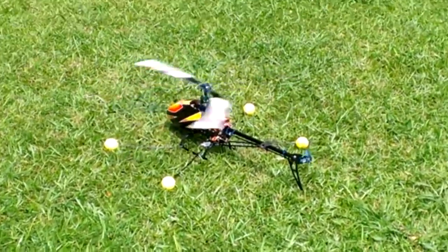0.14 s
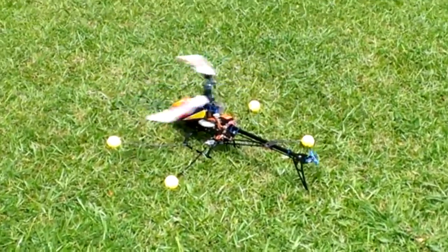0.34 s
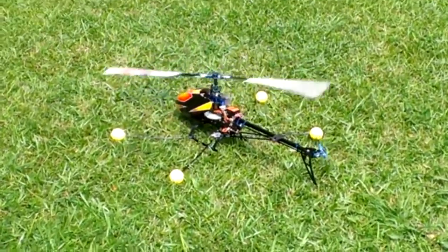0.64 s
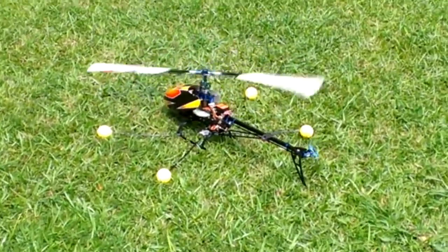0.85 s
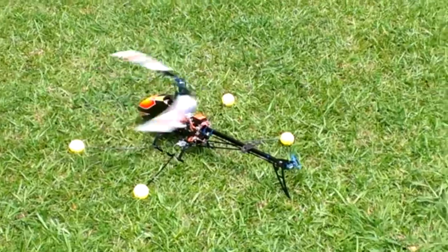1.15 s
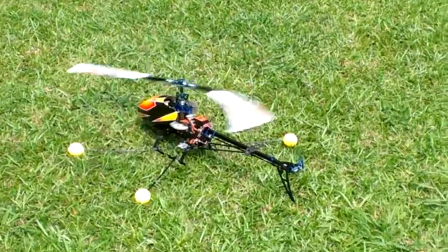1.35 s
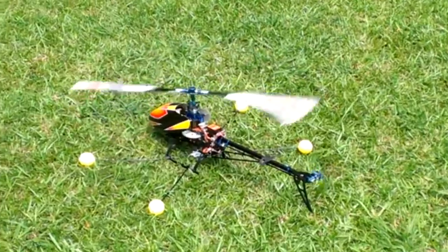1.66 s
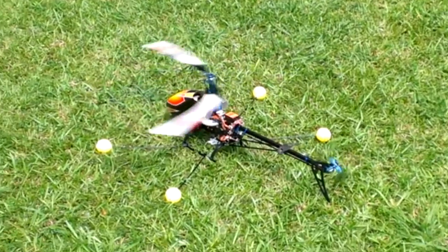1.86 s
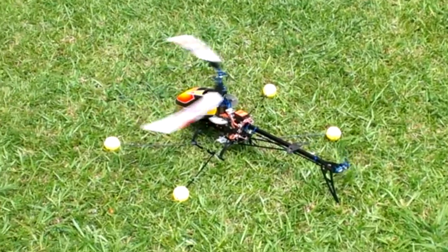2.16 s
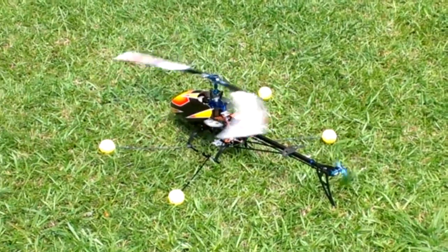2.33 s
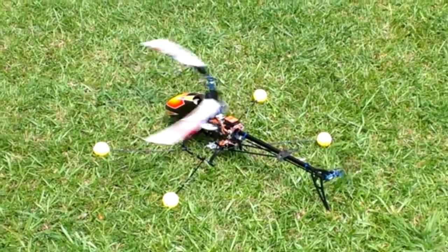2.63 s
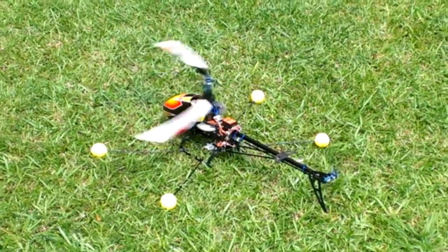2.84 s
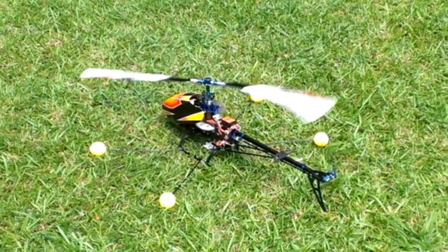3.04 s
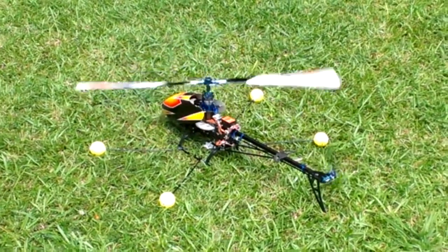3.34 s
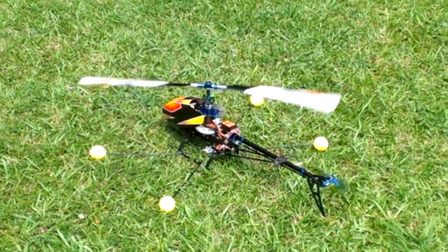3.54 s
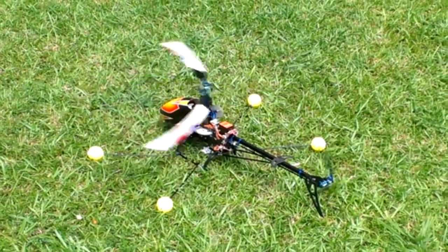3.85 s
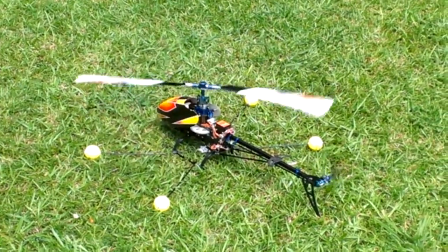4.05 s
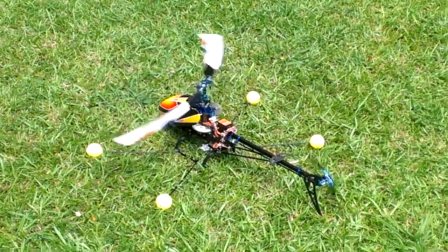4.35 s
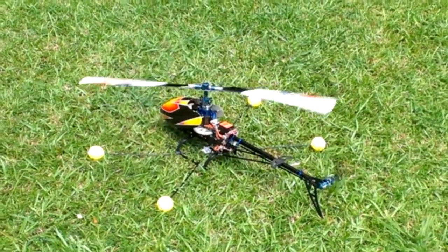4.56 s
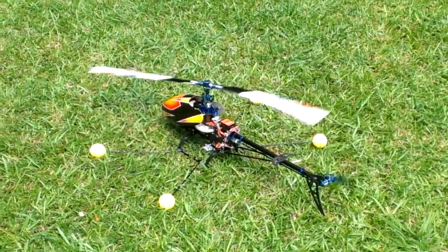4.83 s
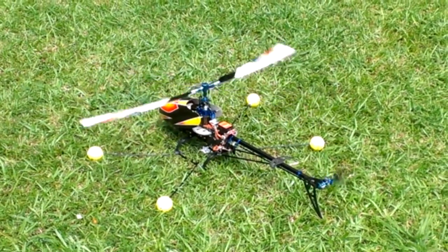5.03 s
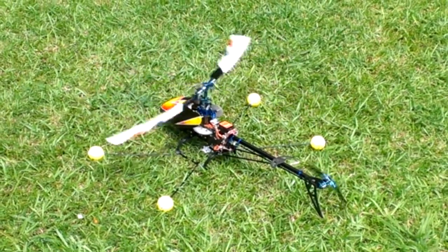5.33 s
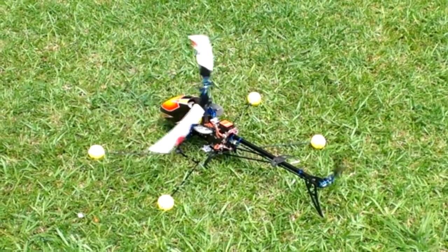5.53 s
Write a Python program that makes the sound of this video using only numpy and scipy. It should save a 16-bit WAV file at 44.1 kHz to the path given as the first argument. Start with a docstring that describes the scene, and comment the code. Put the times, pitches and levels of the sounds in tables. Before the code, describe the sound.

Outdoors on dry open grass with no echo, a model helicopter's motor and gears run down. The bright pulsing whine and sizzling rattle come first, then glide lower and weaken. Rough chatter, low frame buzzes and brittle gear clicks follow, thinning to faint rough squeaks and light ticking over barely audible air and distant hum. A quick soft rustle closes it, slightly right.

```python
"""A small electric model helicopter coasts down for 5.7 s on an open lawn, over faint air and a distant hum.
From the start the gear whine throbs once per rotor turn, motor and tail drive sing, and the teeth rattle and tick.
One falling shaft speed paces these; brief treble flares and frame shudders come at set times.
So do scrapes from 2.7 s and sharp clicks from 3.3 s; near 4 s a falling squeak and faint magnet tones appear.
A soft rustle, shaped noise, swells just before the end."""
import sys
import numpy as np
from scipy import signal
from scipy.fft import rfft, irfft, next_fast_len
from scipy.io import wavfile
from scipy.ndimage import map_coordinates

SR = 44100
rng = np.random.default_rng(int(sys.argv[2]) if len(sys.argv) > 2 else 0)


def int16_out(signal):
    """Quantize to a 16-bit WAV file."""
    q = np.round(np.clip(np.atleast_2d(signal).T, -1, 1) * 32767)
    wavfile.write(sys.argv[1], SR, q.astype(np.int16))


N = 250796
PINION_TEETH, GEAR_TEETH = 13, 150
MOTOR_PER_ROTOR = GEAR_TEETH / PINION_TEETH


def amp(db):
    """Decibels to gain."""
    return 10 ** (np.asarray(db) / 20)


def unit(x):
    """Scale to rms 1."""
    return x / np.sqrt(np.mean(x ** 2) + 1e-20)


def along(points, hz):
    """Interpolate (freq_hz, value) points on a log frequency axis."""
    f, v = np.transpose(points)
    return np.interp(np.log(hz + 1), np.log(f + 1), v)


def bumps(rows, x):
    """Summed dB of bell-shaped (centre, width, gain_db) peaks or dips."""
    return sum(db * np.exp(-((x - centre) / width) ** 2) for centre, width, db in rows)


def curve(points):
    """(time_s, value) points as one value per sample."""
    s, value = np.transpose(points)
    return np.interp(np.arange(N) / SR, s, value)


def wobble(knots_per_s):
    """Smooth random curve."""
    knots = rng.standard_normal(int(N * knots_per_s / SR) + 4)
    return map_coordinates(knots, [np.arange(N) * knots_per_s / SR])


def filtered(x, response):
    """Apply a frequency response."""
    m = next_fast_len(N + SR // 2)
    return irfft(rfft(x, m) * response(np.fft.rfftfreq(m, 1 / SR)), m)[..., :N]


def panned(lean_db):
    """Left and right gains whose mean is 1; lean_db is left minus right."""
    gains = amp(np.array([lean_db, -lean_db]) / 2).reshape(2, -1)
    return gains / gains.mean(axis=0)


def at_speed(motor_hz, start_db, power):
    """Level in dB of a sound whose strength follows a power of the shaft speed."""
    return start_db + power * 20 * np.log10(motor_hz / motor_hz[0])


# narrow hollows in the noise colour: (centre_hz, width_hz, gain_db)
HOLLOWS = [(3440, 140, -22), (8290, 200, -13)]
# left-right correlation: (freq_hz, correlation)
ALIKE = [(60, 0.79), (130, 0.96), (290, 0.97), (640, 0.96), (1410, 0.83), (3100, 0.57), (6820, 0.77),
         (15000, 0.5)]
# stereo lean: (freq_hz, left_minus_right_db)
LEAN = [(60, -0.5), (95, 1), (150, -4.5), (240, -0.5), (380, -1.5), (600, -2.5), (950, -1), (1500, 1.5),
        (2380, -0.5), (3770, -1), (5980, 4), (9470, -0.5), (15000, 1.5)]


def radiate(pair, spectrum, hollows=HOLLOWS):
    """Colour two unrelated excitations and spread them in stereo; the middle has rms 1 before the lean."""
    def mid_side(hz):
        angle = np.arccos(np.clip(along(ALIKE, hz), -1, 1)) / 2
        colour = amp(along(spectrum, hz) + bumps(hollows, hz))
        return colour * [np.cos(angle), np.sin(angle)]

    mid, side = filtered(pair, mid_side)
    stereo = np.array([mid + side, mid - side])
    return filtered(stereo, lambda hz: panned(along(LEAN, hz))) / np.std(mid)


def partial(turns, waver_db, blur_rad):
    """Shaft tone of rms 1, unsteady in strength and phase."""
    return unit(amp(waver_db * wobble(45)) * np.sin(2 * np.pi * turns + blur_rad * wobble(60)))


def ringing(centre_hz, width_hz):
    """Noise of rms 1 in one bell-shaped resonance."""
    noise = rng.standard_normal(N)
    return unit(filtered(noise, lambda hz: np.exp(-((hz - centre_hz) / width_hz) ** 2)))


def burst(start_s, length_s):
    """Envelope that rises fast and falls as a Gaussian of about the given length."""
    age = np.clip((np.arange(N) / SR - start_s) / max(length_s, .002), 0, 6)
    return (1 - np.exp(-12 * age)) * np.exp(-age ** 2)


# whine law before resonance: (start_db, power_of_speed)
WHINE_LAW = (-27.5, 2.6)
# frame resonance carrying the whine: (centre_hz, half_width_hz)
WHINE_RESONANCE = (4810, 105)
# low cutoff of the frame: (edge_hz, steepness)
WHINE_CUTOFF = (4100, 38)
# ripple on the resonance flank: (centre_hz, width_hz, gain_db)
WHINE_RIPPLE = [(4700, 60, 1.5), (4450, 110, -2.5)]
# whine beams left just below resonance: (mesh_hz, left_minus_right_db)
WHINE_LEAN = [(4130, 0), (4350, 15), (4735, 22), (4770, 7.5), (4950, 5.5)]


def whine(rotor_turns, motor_hz):
    """Pinion meshes with the main gear, tight and loose once per rotor turn, and glides through a resonance."""
    mesh_hz = PINION_TEETH * motor_hz
    (centre_hz, half_width_hz), (edge_hz, steepness) = WHINE_RESONANCE, WHINE_CUTOFF
    resonance = 1 / np.hypot(1, (mesh_hz - centre_hz) / half_width_hz)
    cutoff = 1 / np.hypot(1, (edge_hz / mesh_hz) ** steepness)
    carried = amp(bumps(WHINE_RIPPLE, mesh_hz)) * resonance * cutoff
    depth = .44 + .13 * wobble(12)
    once = depth * np.cos(2 * np.pi * (rotor_turns - .33 + .05 * wobble(30)))
    twice = .14 * np.cos(2 * np.pi * (2 * rotor_turns + .28))
    flutter = amp(1.7 * wobble(330) + 1.3 * wobble(130) + .5 * wobble(9))
    mesh_turns = GEAR_TEETH * rotor_turns + .035 * wobble(400)
    mesh = unit((1 + once + twice) * flutter * partial(mesh_turns, waver_db=.6, blur_rad=.2))
    return amp(at_speed(motor_hz, *WHINE_LAW)) * carried * mesh * panned(along(WHINE_LEAN, mesh_hz))


# group laws: (start_db, power_of_speed)
MOTOR_LAW = (-48, 4)
ROTOR_LAW = (-48, 5.4)
DRONE_LAW = (-59.5, 4.8)
# motor partials: (multiple_of_motor_speed, relative_db)
MOTOR = [(3, -0.5), (4, 0), (7, -11.5), (8, 1), (12, -14), (14, -6.5), (18, -27), (20, -6), (21, -8),
         (26, -3), (30, -4.5)]
# rotor and tail drive partials: (multiple_of_rotor_speed, relative_db)
ROTOR = [(3, -27), (4, -28), (5, -6.5), (6, -16), (7, -29), (8.48, -4), (27.25, -6), (48, -6), (106, -6),
         (212, -21)]
# beating drone pair: (multiple_of_rotor_speed, relative_db)
DRONE = [(16.96, 6), (18, 2.5)]
# panel resonances and notches: (centre_hz, width_hz, gain_db)
PANELS = [(960, 70, 4), (1130, 130, -8), (2790, 230, 9.5), (3800, 150, 15), (4780, 300, 27),
          (6850, 230, 15), (11420, 170, 11)]
# narrow resonance of the drone: (centre_hz, width_hz, gain_db)
DRONE_RESONANCE = [(588.9, 3, 16)]
OVERTONE_FADE = 0.18  # extra power of speed per multiple: high motor partials die first


def singing(rotor_turns, motor_hz):
    """Motor, rotor and tail drive partials fade with speed and swell or sink at resonances and notches."""
    rotor_hz = motor_hz / MOTOR_PER_ROTOR

    def tone(multiple, db):
        level = amp(db + bumps(PANELS, multiple * motor_hz))
        judder = unit(amp(2.4 * wobble(190)) * (1 + .2 * np.cos(2 * np.pi * rotor_turns)))
        turns = multiple * MOTOR_PER_ROTOR * rotor_turns
        return level * judder * partial(turns, waver_db=2.0, blur_rad=0.63)

    def boom(multiple, db):
        level = amp(db + bumps(DRONE_RESONANCE, multiple * rotor_hz))
        return level * partial(multiple * rotor_turns, waver_db=3, blur_rad=0.21)

    motor = sum(tone(k, at_speed(motor_hz, db, OVERTONE_FADE * k)) for k, db in MOTOR)
    rotors = sum(tone(k / MOTOR_PER_ROTOR, db) for k, db in ROTOR)
    drone = sum(boom(k, db) for k, db in DRONE)
    return (amp(at_speed(motor_hz, *MOTOR_LAW)) * motor
            + amp(at_speed(motor_hz, *ROTOR_LAW)) * rotors
            + amp(at_speed(motor_hz, *DRONE_LAW)) * drone)


def surface(turns, count):
    """Random flaws around a wheel, met again every turn: a comb of lines that falls with the speed."""
    position = [turns % 1 * count]
    sides = [map_coordinates(rng.standard_normal(count), position, mode="grid-wrap") for side in range(2)]
    return unit(np.array(sides))


def knocks(rotor_turns, per_turn, spread_db):
    """Backlash impacts of uneven size, thinning out as the rotor slows."""
    hit = rng.random(N) < np.gradient(rotor_turns) * per_turn
    size = amp(spread_db * rng.uniform(-1.0, 1, N))
    return unit(hit * size * np.sign(rng.standard_normal((2, N))))


def teeth(rotor_turns, gear_db, knock_db):
    """Contact force of rms 1: sliding noise, flaws of the main gear, and backlash."""
    sliding = rng.standard_normal((2, N))
    flaws = amp(gear_db) * surface(rotor_turns, count=1200)
    backlash = amp(knock_db) * knocks(rotor_turns, per_turn=45, spread_db=2.0)
    return unit(sliding + flaws + backlash)


# layer laws before drive: (start_db, power_of_speed, share_of_drive)
RUMBLE_LAW = (-53.5, 2.23, 0.99)
FRAME_LAW = (-44, 3.37, 0.82)
CANOPY_LAW = (-43, 3.75, 0.44)
RASP_LAW = (-33, 3.78, 0.88)
SIZZLE_LAW = (-36, 4.8, 0.7)
# drive beyond speed alone, frame shake and tooth chatter: (time_s, drive_db)
SHAKE = [(0, 2), (0.8, 0), (1.0, 3.5), (1.3, -0.5), (1.8, 7), (2.9, 5.5), (3.75, 7), (4.05, -1.5),
         (4.3, 0.5), (4.8, -3.5), (5.2, 4)]
CHATTER = [(0, -0.5), (0.7, -0.5), (1.0, 1), (1.35, 1.3), (1.7, 5), (2.15, 9), (2.95, 9.5), (3.39, 0.5),
           (3.58, 5), (3.665, 2), (3.72, 8.5), (3.765, 5), (3.82, 5), (4.07, 1), (4.35, 4.5), (4.9, 3.5),
           (5.6, 7)]
# layer colours: (freq_hz, gain_db)
RUMBLE = [(41, -49), (70, -14), (146, -7), (184, -3), (215, 5), (248, 0), (265, 3), (313, -3), (427, 1),
          (470, 3), (610, -37), (1030, -120)]
FRAME = [(250, -55), (420, -14.5), (514, 3.5), (700, 3), (779, -2.5), (857, 2.5), (959, 3.5), (1230, -9),
         (1420, -6.5), (1500, -8), (1950, -90), (3300, -120)]
CANOPY = [(710, -27), (1200, -5.5), (1440, -10), (1760, -2.5), (1890, -1.5), (2130, 1.5), (2350, -3.5),
          (2710, 3), (3320, -4), (3500, 1.5), (4550, -15), (7700, -120)]
RASP = [(1940, -60), (3300, -34), (3430, -22), (3720, -9), (3940, -7.5), (4210, -3.5), (4760, 2), (5450, 0),
        (5950, 4), (6450, 1.5), (6990, 4), (8220, -4), (9310, -2.5), (10600, -10.5), (12000, -26),
        (15600, -36), (22000, -120)]
SIZZLE = [(5000, -24.5), (8500, -2.5), (9090, -9.5), (10500, -0.5), (12000, -8), (14000, -2),
          (15800, -13.5)]
# once-a-turn rub, deepest at middling speed: (motor_turns_per_s, width_turns_per_s, swing_db)
RUB_PEAK = [(268, 62, 3.3)]
RUB_TURN = 0.13  # share of a rotor turn


def rattle(rotor_turns, motor_hz, ticks, tick_strength):
    """Teeth shake frame and canopy, and rasp; the slightly eccentric gear rubs harder once a turn."""
    chatter_db, shake_db = curve(CHATTER), curve(SHAKE)
    rub_db = bumps(RUB_PEAK, motor_hz) * np.cos(2 * np.pi * (rotor_turns - RUB_TURN))
    tremble_db = 2.03 * wobble(50)
    tick_depth = tick_strength * (1 - motor_hz / motor_hz[0])
    grain = amp(1.28 * wobble(220)) * (1 + tick_depth * ticks) / (1 + tick_depth / 2)

    def layer(law, drive_db, sway_db, spectrum, gear_db, knock_db):
        start_db, power, share = law
        level_db = at_speed(motor_hz, start_db, power) + share * drive_db + sway_db
        return amp(level_db) * radiate(teeth(rotor_turns, gear_db, knock_db), spectrum)

    rumble_sway_db = 0.82 * wobble(30) + 0.14 * tremble_db
    canopy_sway_db = 0.52 * tremble_db + 0.5 * rub_db
    sizzle_sway_db = 0.058 * rub_db + 0.8 * wobble(19)
    rumble = layer(RUMBLE_LAW, shake_db, rumble_sway_db, RUMBLE, gear_db=-6.0, knock_db=-5.0)
    frame = layer(FRAME_LAW, shake_db, tremble_db, FRAME, gear_db=-3.0, knock_db=-4.0)
    canopy = layer(CANOPY_LAW, chatter_db, canopy_sway_db, CANOPY, gear_db=-6.0, knock_db=1.5)
    rasp = layer(RASP_LAW, chatter_db, rub_db, RASP, gear_db=-4.5, knock_db=-4.5)
    sizzle = layer(SIZZLE_LAW, chatter_db, sizzle_sway_db, SIZZLE, gear_db=-17.0, knock_db=-11)
    return rumble + frame + canopy + grain * (rasp + sizzle + flares(rotor_turns))


# brief treble flares, before grain: (start_s, length_s, sizzle_db, rasp_db)
FLARES = [(0.0, 0.085, -35, -54), (0.83, 0.13, -39, -38), (1.242, 0.072, -47, -37), (3.69, 0.039, -45, -47),
          (4.308, 0.2, -51.5, -61), (4.614, 0.15, -58, -53.5)]
FLARE_EDGE_S = .03


def flares(rotor_turns):
    """Sizzle and rasp of the teeth flare up, hold and drop back."""
    t = np.arange(N) / SR
    force = teeth(rotor_turns, gear_db=-28.0, knock_db=0)
    sizzle, rasp = radiate(force, SIZZLE), radiate(force, RASP)

    def flare(start_s, length_s, sizzle_db, rasp_db):
        to_edge_s = np.minimum(t - start_s, start_s + length_s - t)
        gate = np.clip(to_edge_s / FLARE_EDGE_S + .5, 0, 1)
        return gate * (amp(sizzle_db) * sizzle + amp(rasp_db) * rasp)

    return sum(flare(*row) for row in FLARES)


# chatter of loose parts: (start_s, strength_db, length_s, canopy_over_gears_db, ring_hz)
SCRAPES = [(2.715, -29, 0.013, -13, 5900), (3.17, -28, .008, -12, 5640), (3.343, -27, 0.02, -8, 5400),
           (3.434, -27, .01, -18, 5070), (3.684, -27, 0.02, -17, 5350), (3.73, -33, .012, -17, 5900),
           (3.78, -25.5, 0.009, -20, 5840), (3.79, -26, 0.0071, -20, 5200), (3.885, -35, .013, -11, 4800),
           (4.259, -38, .011, -1.5, 4700), (4.311, -38, .011, -7, 3930), (4.553, -36.5, .014, -9, 3900),
           (4.679, -37, 0.024, -8, 3620)]


def scrapes(rotor_turns, ring_db):
    """Short chatter bursts of the slack drive, from gears and, weaker, canopy; each rings at its own pitch."""
    force = teeth(rotor_turns, gear_db=-4.0, knock_db=-5)
    gears, canopy = radiate(force, RASP), radiate(force, CANOPY)

    def scrape(start_s, strength_db, length_s, canopy_db, ring_hz):
        body = gears + amp(canopy_db) * canopy + amp(ring_db) * ringing(ring_hz, 300)
        return amp(strength_db - 10) * burst(start_s, length_s) * body

    return sum(scrape(*row) for row in SCRAPES)


CONTACT_S = .0028  # how long two teeth grate when they meet


def touches(at, sizes):
    """Brief swell of contact pressure around each given sample."""
    return np.convolve(np.bincount(at, sizes, N), np.hanning(round(CONTACT_S * SR)), "same")


def ticking(rotor_turns, per_turn, scatter, spread_db):
    """Drive slack closes several times a turn, at a loosely even pace."""
    count = int(rotor_turns[-1] * per_turn)
    slip, size = rng.standard_normal((count, 2)).T
    turns = (np.arange(count) + scatter * slip) / per_turn
    at = np.searchsorted(rotor_turns, turns).clip(0, N - 1)
    return touches(at, amp(spread_db * np.minimum(size, .6)))


# sharpest clicks of the slack teeth: (time_s, pressure_db)
CLICKS = [(3.345, -27), (3.432, -26), (3.552, -28), (3.574, -28), (3.602, -26), (3.607, -27), (3.683, -23),
          (3.691, -24), (3.696, -23), (3.734, -28), (3.778, -26), (3.848, -28), (3.931, -32), (3.961, -30),
          (3.983, -34), (4.116, -36), (4.141, -32), (4.31, -34), (4.316, -32), (4.337, -32), (4.365, -33),
          (4.418, -33), (4.426, -34), (4.442, -34), (4.577, -35), (4.628, -34), (4.674, -33), (4.692, -31),
          (4.72, -36), (4.742, -36), (4.804, -40), (4.829, -41), (4.865, -40), (4.91, -41), (4.929, -41),
          (4.967, -42), (4.989, -39), (5.086, -39.5), (5.117, -40), (5.243, -45)]
# ordinary ticks between them: (time_s, pressure_db)
TICK_LEVEL = [(0, -42), (2.2, -30), (3.3, -32), (3.6, -32), (4.06, -43), (4.14, -38), (4.27, -42),
              (4.33, -36.5), (4.47, -37.5), (4.52, -43), (4.7, -40), (4.8, -46), (4.98, -45), (5.05, -51),
              (5.13, -47), (5.3, -54), (5.6, -56)]
# ring of a clicking tooth: (freq_hz, relative_db, t60_s)
GEAR_MODES = [(5060, -8.5, 0.0091), (5920, -1, 0.011), (6480, -2, 0.0072), (6760, -5.5, 0.011),
              (9230, -9.5, 0.0055), (10400, -12, 0.0073), (12600, -11.5, .004), (13800, -28, .005)]


def clicks(ticks):
    """Slack teeth grate for an instant when they meet and ring the gear; a few meet hard."""
    s, db = np.transpose(CLICKS)
    hard = touches(np.round(s * SR).astype(int), amp(db))
    pressure = np.maximum(ticks * amp(curve(TICK_LEVEL)), hard)
    t = np.arange(SR // 50) / SR

    def ring(hz, t60_s):
        shared, separate = rng.standard_normal(N), rng.standard_normal((2, N))
        grating = pressure * (shared + .35 * separate)
        # decaying sine of energy 1
        mode = unit(np.sin(2 * np.pi * hz * t) * 1000 ** (-t / t60_s))[None] / np.sqrt(len(t))
        return panned(along(LEAN, hz)) * signal.oaconvolve(grating, mode, axes=1)[:, :N]

    return sum(amp(level_db - 8.5) * ring(hz, t60_s) for hz, level_db, t60_s in GEAR_MODES)


# low frame resonances set off: (start_s, strength_db, pitch_hz, length_s)
SHUDDERS = [(0.95, -43, 540, 0.1), (1.736, -51, 161, 0.54), (1.99, -38.5, 540, 0.44),
            (2.507, -33.5, 484, 0.12), (2.7, -37.5, 920, 0.31), (2.936, -38.5, 404, 0.089),
            (3.188, -38.5, 666, 0.051), (3.585, -33.5, 566, 0.051), (3.733, -39.5, 605, 0.057),
            (3.924, -49, 870, 0.083), (4.254, -52, 577, 0.082), (4.55, -48, 800, 0.024),
            (5.056, -58, 636, .08), (5.15, -58, 570, .06), (5.518, -60, 570, 0.044)]


def shudders():
    """Frame booms briefly around one of its low resonances: noise in a narrow band."""
    return sum(amp(strength_db - 6) * burst(start_s, length_s) * ringing(pitch_hz, 100)
               for start_s, strength_db, pitch_hz, length_s in SHUDDERS)


# falling squeak: (start_share_of_turn, start_hz, end_hz, length_share_of_turn)
SQUEAK = (.25, 4600, 3750, .3)
# squeak law before fade-in: (start_db, power_of_speed)
SQUEAK_LAW = (-48, 2.2)


def squeak(rotor_turns, motor_hz):
    """Tight spot of the slow gear gives a faint, rough, falling squeak each turn, of uneven strength."""
    turn, start_hz, end_hz, length = SQUEAK
    through = np.clip((rotor_turns - turn + .07 * wobble(14)) % 1 / length, 0, 1)
    pitch_hz = start_hz + (end_hz - start_hz) * through
    chirp = partial(np.cumsum(pitch_hz) / SR + .22 * wobble(700), waver_db=3, blur_rad=1.5)
    slow = np.clip((230 - motor_hz) / 40, 0, 1)
    level = amp(at_speed(motor_hz, *SQUEAK_LAW) + 3 * wobble(14))
    return level * slow * np.sin(np.pi * through) * chirp


# magnet tones before resonance: (multiple_of_motor_speed, level_db)
COGGING = [(8, -80), (12, -86)]
# frame resonances they pass: (centre_hz, width_hz, gain_db)
COGGING_RESONANCE = [(990, 150, 13), (1480, 130, 6), (2190, 110, 14)]
COGGING_BELOW = 200  # motor turns per second


def cogging(rotor_turns, motor_hz):
    """When the motor is slow, the pull of its magnets is heard as faint falling tones."""
    motor_turns = rotor_turns * MOTOR_PER_ROTOR
    slow = np.clip((COGGING_BELOW - motor_hz) / 10, 0, 1)

    def tone(multiple, db):
        level = amp(db + bumps(COGGING_RESONANCE, multiple * motor_hz))
        return level * partial(multiple * motor_turns, waver_db=2.5, blur_rad=.9)

    return slow * sum(tone(k, db) for k, db in COGGING)


# rustle onset: (start_s, rise_s)
RUSTLE_TIME = (5.631, .036)
# rustle strength: (level_db, left_minus_right_db)
RUSTLE_LEVEL = (-49.5, -2)
# rustle colour: (freq_hz, gain_db)
RUSTLE_COLOUR = [(300, -35), (570, -18), (800, -1), (1050, -4), (1500, -7), (2040, -9), (2660, -35),
                 (3340, -10), (4200, -6), (5550, -17), (10000, -21), (13000, -60)]


def rustle():
    """Soft coloured noise starts a little to the right and swells quickly."""
    (start_s, rise_s), (level_db, lean_db) = RUSTLE_TIME, RUSTLE_LEVEL
    age_s = np.arange(N) / SR - start_s
    swell = (age_s > 0) * np.clip(.25 + .75 * age_s / rise_s, 0, 1)
    noise = radiate(rng.standard_normal((2, N)), RUSTLE_COLOUR)
    return amp(level_db) * swell * panned(lean_db) * noise


# open-air colour: (freq_hz, gain_db)
LAWN = [(15, -50), (25, -27), (48, -32), (59, -20), (102, -11.5), (425, -17.5), (588, -3.5), (740, -17.5),
        (950, -6.5), (1390, -17.5), (2100, -8.5), (3200, -17.5), (3890, -14), (5200, -9), (15800, -30)]
# distant hum: (freq_hz, rms_db)
HUM = [(75.5, -82), (99, -76)]


def lawn():
    """Faint open air, coloured noise, with a distant hum of unsteady tones."""
    t = np.arange(N) / SR
    hum = sum(amp(db) * partial(hz * t, waver_db=2.5, blur_rad=.3) for hz, db in HUM)
    return amp(-58.0) * radiate(rng.standard_normal((2, N)), LAWN, hollows=[]) + hum


# coast-down: (time_s, motor_turns_per_s)
SPEED = [(0, 380.8), (0.5, 374.3), (1.3, 366), (1.7, 359), (2.7, 323.4), (3.1, 300.8), (3.75, 245),
         (4.13, 216.2), (5.05, 159.3), (5.25, 138), (5.69, 84)]


def scene():
    """Motor turns rotor through the gears; tones and steady rattle follow their angle or speed,
    while flares, scrapes, sharp clicks and shudders come at set times."""
    motor_hz = curve(SPEED)
    rotor_turns = np.cumsum(motor_hz) / SR / MOTOR_PER_ROTOR
    ticks = ticking(rotor_turns, per_turn=7.6, scatter=.2, spread_db=3)
    tones = whine(rotor_turns, motor_hz) + singing(rotor_turns, motor_hz)
    slow_tones = squeak(rotor_turns, motor_hz) + cogging(rotor_turns, motor_hz)
    slack = rattle(rotor_turns, motor_hz, ticks, tick_strength=0.34)
    impacts = scrapes(rotor_turns, ring_db=-1.5) + clicks(ticks) + shudders()
    return tones + slow_tones + slack + impacts + rustle() + lawn()


TOP_HZ = 15900


def record(dry):
    """Keep nothing at or above the band limit."""
    return filtered(dry, lambda hz: hz < TOP_HZ)


dry = scene()
out = record(dry)
int16_out(out)
```